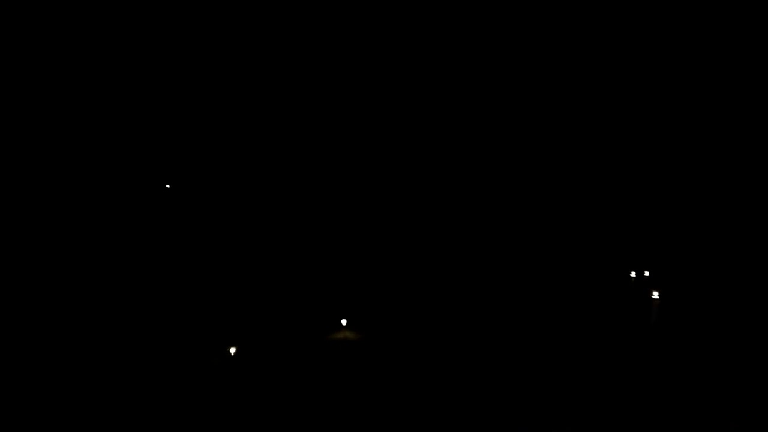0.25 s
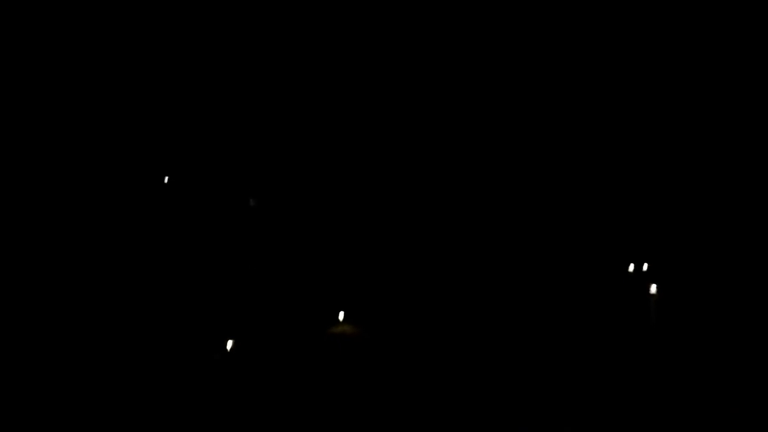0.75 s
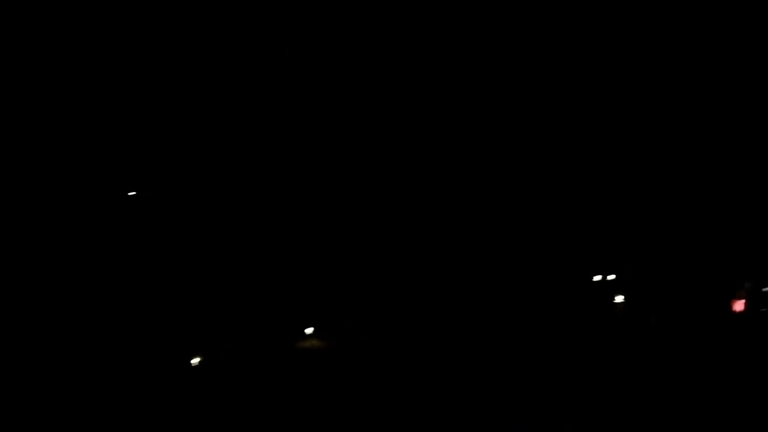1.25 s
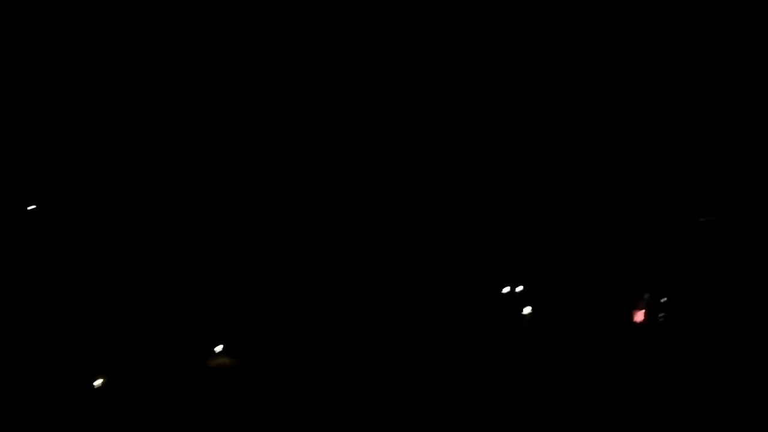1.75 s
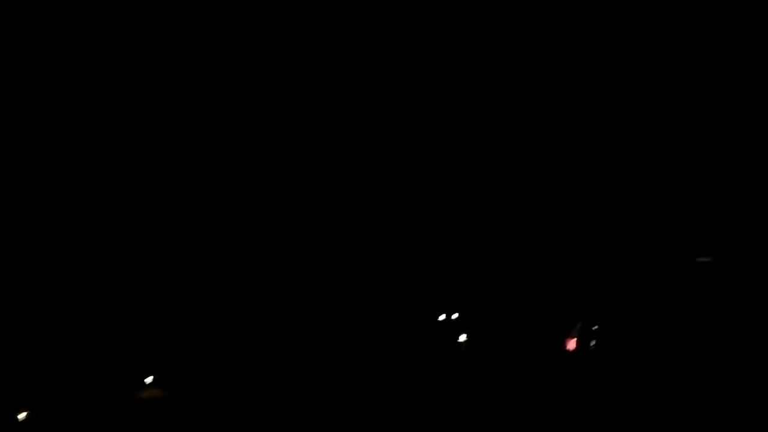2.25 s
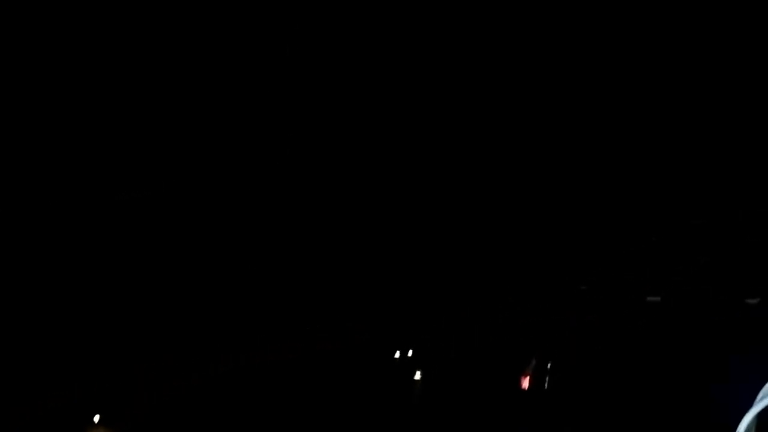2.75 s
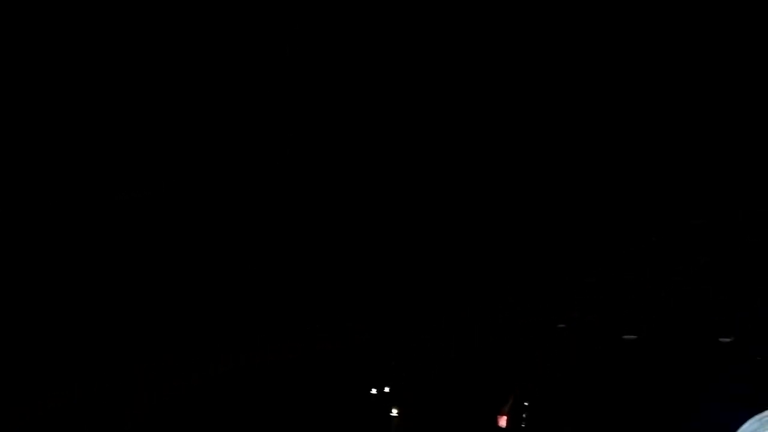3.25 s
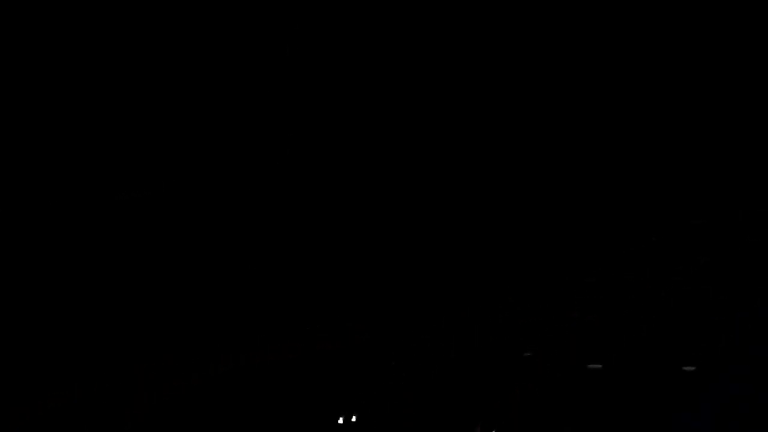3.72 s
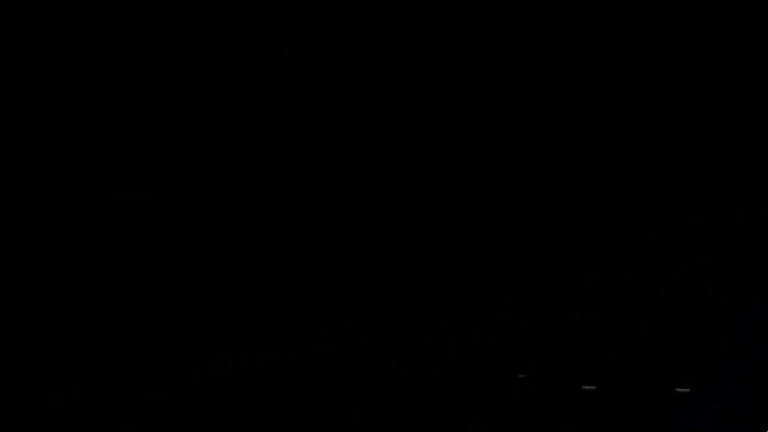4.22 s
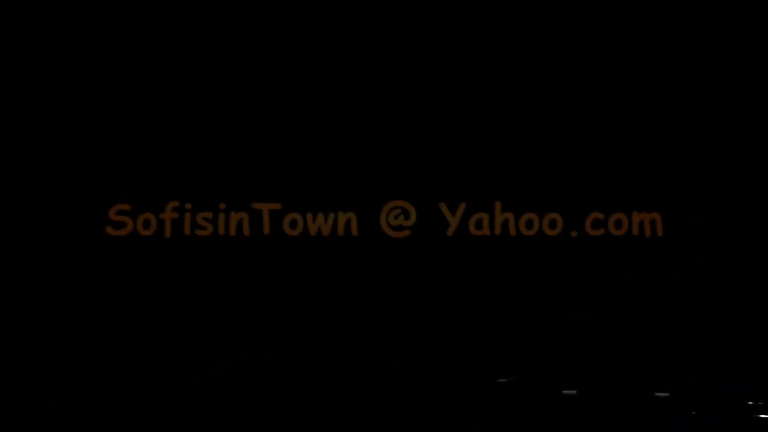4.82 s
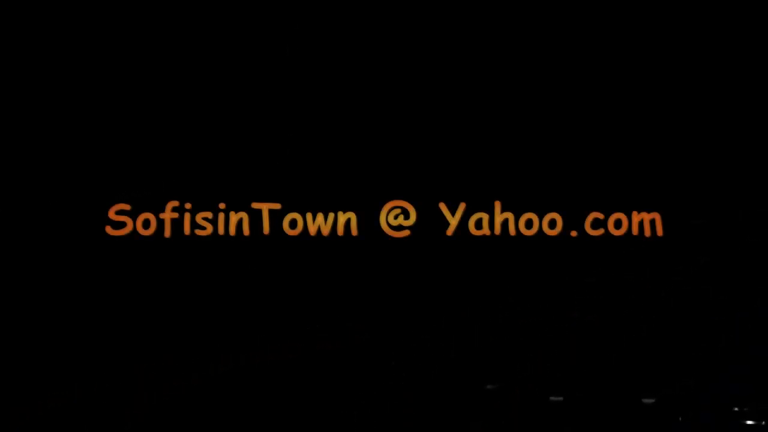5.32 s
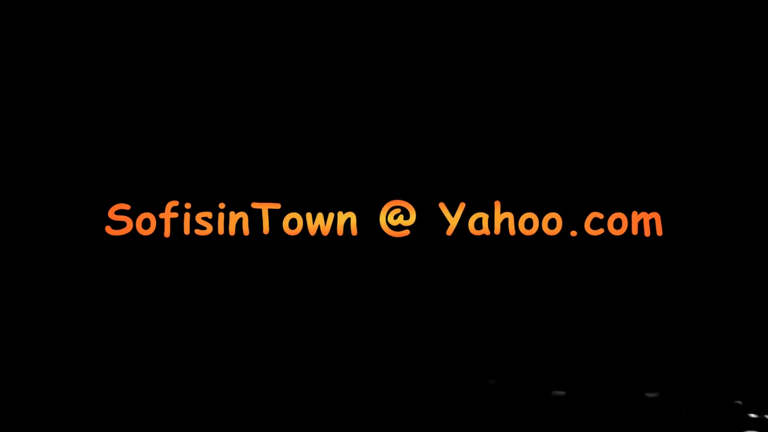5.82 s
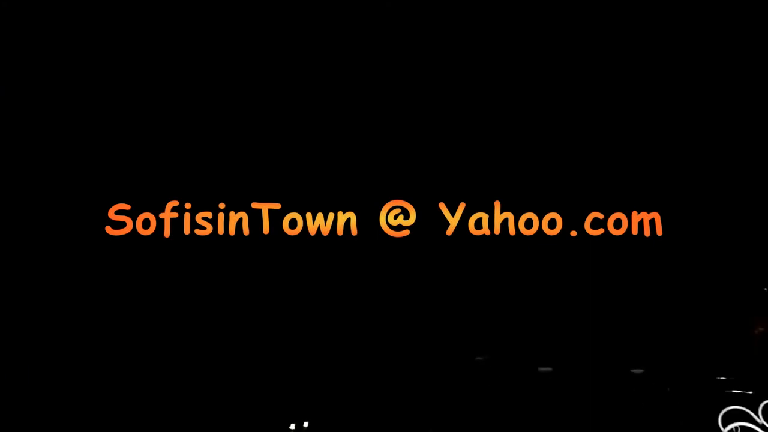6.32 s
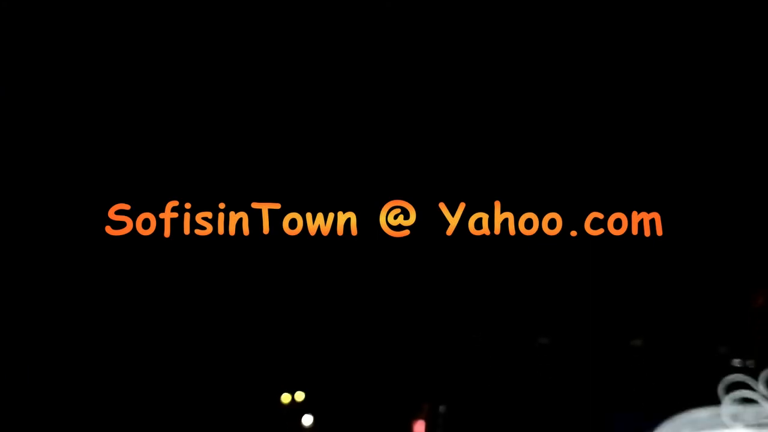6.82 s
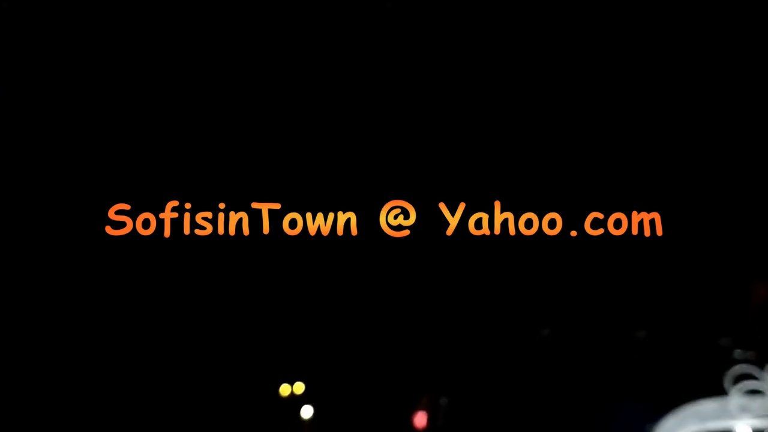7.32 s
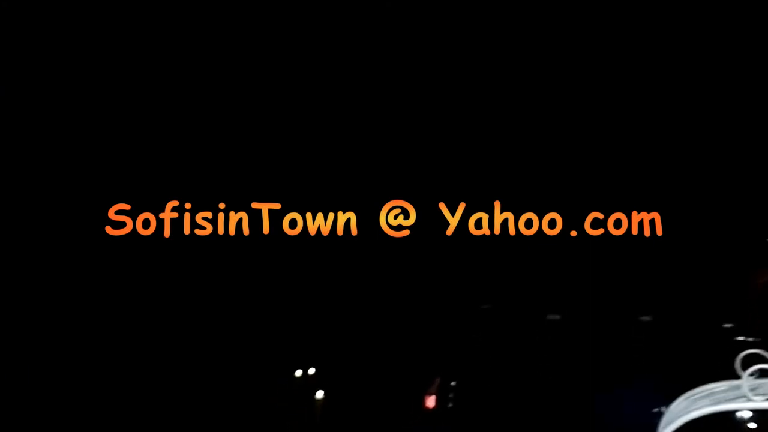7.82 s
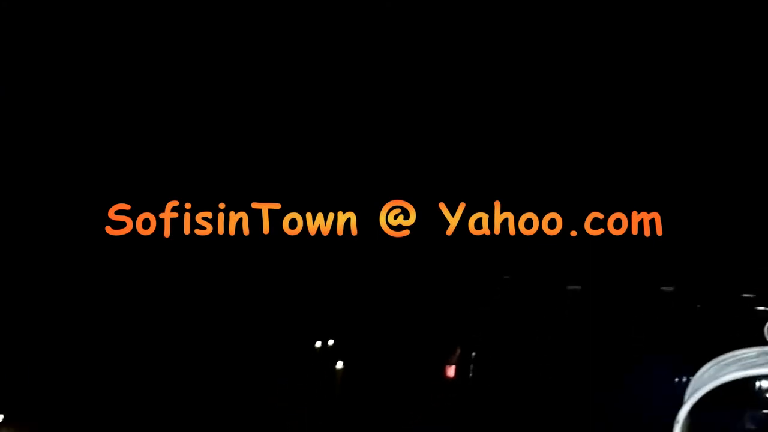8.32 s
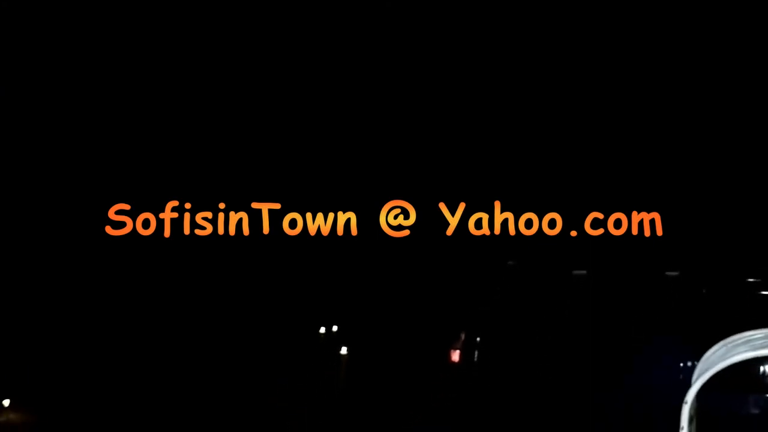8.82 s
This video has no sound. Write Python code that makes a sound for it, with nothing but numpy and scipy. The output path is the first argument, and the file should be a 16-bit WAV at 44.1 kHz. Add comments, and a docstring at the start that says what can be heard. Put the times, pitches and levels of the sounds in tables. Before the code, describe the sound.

At night beside trees, insects trill and rasp continuously while sharp, echoing firework bangs and brief crackling swarms break out at uneven intervals.

```python
"""Night beside a wood: tree crickets, katydids and a low rumble start loud and settle, under a dull far roll.
Fireworks join in: dull bangs from 0.7 s, and from 3 s swarms of crackling stars between later bangs. A last
bang near 8.5 s is followed by a few more pops. Insects are pulsed near-sines and coloured noise; bursts are
short shock waves with a slap echo off a wall and a tail scattered by the trees."""
import sys
import numpy as np
from scipy import signal
from scipy.fft import rfft, irfft, next_fast_len
from scipy.io import wavfile
from scipy.ndimage import uniform_filter1d

SR = 44100
rng = np.random.default_rng(int(sys.argv[2]) if len(sys.argv) > 2 else 0)


def dump_mix(stems):
    """Bounce the given channels to the path in sys.argv[1] as a 16-bit WAV at rate SR."""
    frames = np.atleast_2d(stems).T  # one column per channel
    limited = np.clip(frames, -1, 1)  # hard clip at full scale
    pcm = np.round(limited * 32767).astype(np.int16)
    wavfile.write(sys.argv[1], SR, pcm)


N = 399546


def from_db(db):
    """Decibels to gain."""
    return 10 ** (np.asarray(db) / 20)


def rms_one(x):
    """Scale to rms 1."""
    return x / np.sqrt(np.mean(x ** 2) + 1e-20)


def in_time(rows):
    """Table columns as curves over all samples; the first column is time."""
    s, *columns = np.transpose(rows)
    return [np.interp(np.arange(N) / SR, s, c) for c in columns]


def at_hz(points, hz):
    """Read a spectrum on a log-frequency axis."""
    return np.interp(np.log(hz + 1), np.log(np.array(points)[:, 0]), np.array(points)[:, 1])


def drift(rate_hz):
    """Slow random curve of spread 1: noise through a double pole at rate_hz, worked out every 40 samples."""
    r = np.exp(-2 * np.pi * rate_hz * 40 / SR)
    raw = rng.standard_normal(N // 40 + 2002)
    slow = signal.lfilter([1], [1, -2 * r, r * r], raw)[2000:]     # skip the filter's start-up
    return np.interp(np.arange(N) / 40, np.arange(len(slow)), rms_one(slow))


def spread(two, spectrum=None):
    """Two unrelated signals become left and right, alike in the bass, take on a colour and get rms 1."""
    # how alike left and right are: [pitch_hz, likeness 0-1]
    likeness = [(30, 0.97), (125, 0.95), (300, 0.83), (600, 0.46), (1100, 0.031), (2000, 0.028)]
    size = two.shape[1]
    hz = np.fft.rfftfreq(size, 1 / SR)
    alike = np.clip(at_hz(likeness, hz), 0, 1)
    mid, side = rfft(two)
    pair = np.sqrt(1 + alike) * mid + np.sqrt(1 - alike) * side * [[1], [-1]]
    if spectrum is not None:
        in_band = (hz > .8 * spectrum[0][0]) * (hz < 1.2 * spectrum[-1][0])
        pair = pair * from_db(at_hz(spectrum, hz)) * in_band
    return rms_one(irfft(pair, size))


def noise(spectrum):
    """Stereo noise of a given colour, rms 1."""
    return spread(rng.standard_normal((2, next_fast_len(N))), spectrum)[:, :N]


def tree_crickets(opening_db, count=24):
    """Each singer is a wavering near-sine pulsed by its wing strokes; singers alternate left and right."""
    singers, t = np.zeros((2, N)), np.arange(N) / SR
    for k, (pitch, stroke, phase) in enumerate(rng.standard_normal((count, 3))):
        pitch_hz = 3010 - 130 * abs(pitch) + 45 * drift(30)
        stroke_hz = 52 + 7 * stroke
        strokes = np.maximum(np.sin(2 * np.pi * stroke_hz * t + 9 * phase) + 1.2, 0)
        tone = np.sin(2 * np.pi * np.cumsum(pitch_hz) / SR)
        singers[k % 2] += from_db(2.4 * drift(4.7)) * strokes * tone
    return from_db(-50.5 + opening_db + 0.71 * drift(0.64)) * rms_one(singers)


def trill(opening_db, swell_db):
    """Many singers blur into a band of noise near 2-3 kHz that swells with the katydid chorus."""
    # colour of the blurred trill: [pitch_hz, relative_db per Hz]
    trill_colour = [(530, -51), (900, -21), (1340, -17.5), (1920, 0.5), (2430, -4), (2890, 0), (3190, -7.5),
                    (3600, -17), (4680, -53), (7920, -120)]
    level_db = -50.5 + 1.23 * opening_db + 0.9 * swell_db + 1.53 * drift(22)
    return from_db(level_db) * noise(trill_colour)


def throb():
    """Katydids rasp in step: evenly within a bout, each rasp a rounded swell around the mean level, in dB."""
    # bouts of rasping: [first_rasp_s, last_rasp_s, swell_db before the moving mean is taken off]
    bouts = [(0.15, 1.305, 2.6), (1.455, 1.797, 2), (2.507, 3.206, 2), (3.441, 3.786, 2),
             (4.004, 4.575, 2.8), (4.81, 5.724, 2.5), (5.95, 6.162, 1.6), (6.479, 7.063, 3.6),
             (7.388, 7.99, 2.5), (8.77, 8.9, 1)]
    rasp_s = .1165     # about the time from one rasp to the next; also the length of a swell
    peaks = np.zeros(N)
    for first_s, last_s, swell_db in bouts:
        count = round((last_s - first_s) / rasp_s) + 1
        rasps_s = np.linspace(first_s, last_s, count)
        peaks[(rasps_s * SR).astype(int)] = swell_db
    swells = signal.fftconvolve(peaks, np.hanning(round(rasp_s * SR)), "same")
    return swells - uniform_filter1d(swells, size=SR // 4)


def katydids(opening_db, chorus_db, throb_db):
    """The katydid chorus is a broad band of noise, swelling slowly and throbbing with the rasps."""
    # colour of the rasping: [pitch_hz, relative_db per Hz]
    katydid_colour = [(1880, -40), (3200, -13), (3350, -11), (3600, -11), (4090, -4), (5180, -6.5),
                      (6170, -19), (7500, -30.5), (9750, -39), (16500, -120)]
    return from_db(chorus_db + opening_db + throb_db + 0.84 * drift(42)) * noise(katydid_colour)


def insect_treble(opening_db, swell_db, throb_db):
    """Hissing treble noise that follows the chorus's swells and throbs; the right side is louder."""
    # colour of the hiss: [pitch_hz, relative_db per Hz]
    treble_colour = [(4120, -7), (7000, -9), (8020, -17), (9500, -7.5), (11200, -7.5), (12300, -7.5),
                     (15200, -6)]
    level_db = -61 + opening_db + 1.23 * swell_db + 0.61 * throb_db + 0.47 * drift(20)
    left_right_db = np.array([[-2.0], [1.8]])
    return from_db(level_db + left_right_db) * noise(treble_colour)


def rumble(opening_db):
    """Low noise, mostly below 300 Hz, that wavers slowly."""
    # colour of the rumble: [pitch_hz, relative_db per Hz]
    rumble_colour = [(12, -44), (20, -8), (37, -25), (65, -5), (124, -4.5), (140, -13), (178, -5),
                     (300, -10.5), (390, -19), (660, -120)]
    return from_db(-57.5 + opening_db + 0.81 * drift(2.4)) * noise(rumble_colour)


def far_roll():
    """Far echoes run together into a dull roll: low-mid noise riding a drawn level curve."""
    # level of the roll, before its waver: [time_s, level_db]
    roll_curve = [(0, -44), (.25, -56), (.8, -59), (1.5, -69), (2.0, -45), (2.35, -49.5), (2.95, -46.5),
                  (3.45, -39), (4.0, -50), (4.6, -54), (6.2, -57), (7.1, -56), (7.85, -57.5), (8.2, -44),
                  (8.5, -59), (9.06, -48)]
    # colour of the far echoes: [pitch_hz, relative_db per Hz]
    roll_colour = [(88, -46), (150, -26), (344, 2.5), (377, -3), (405, 2), (684, 4), (1300, -21),
                   (1690, -46), (2860, -120)]
    (roll_db,) = in_time(roll_curve)
    return from_db(roll_db + 2.0 * drift(7.1)) * noise(roll_colour)


def shock(length_ms, edge_hz, treble_db, treble_hz, thump_db):
    """N-shaped wave; ground and foliage cut it steeply above an edge and let a little treble through; peak 1."""
    t = np.arange(2048) / SR * 1000 / length_ms     # in wave lengths
    wave = (1 - 2 * t) * (t < 1) * np.exp(-.6 * t)     # the suction phase is the weaker
    body = signal.sosfilt(signal.cheby1(6, 1.5, edge_hz, fs=SR, output="sos"), wave)
    front = (t > .6) * np.exp(-t * 3.8)     # the treble comes from this steep front alone
    treble = signal.sosfilt(signal.butter(2, [edge_hz, treble_hz], "band", fs=SR, output="sos"), front)
    both = body + from_db(treble_db) * treble / np.abs(treble).max()
    # the ground shakes
    thump = signal.sosfilt(signal.butter(1, [55, 130], "band", fs=SR, output="sos"), body)
    both = signal.sosfilt(signal.butter(1, 260, "high", fs=SR, output="sos"), both)
    both = both + from_db(thump_db) * thump
    return both / np.abs(both).max()


def paths(slap_db, scatter_db, t60, depth_s, late_db, bass_db, lift_db, echo_db=0):
    """Direct path, wall echo, reflections close by after each, trunks as deep as the wood goes, far hills."""
    # sound returned by trunks and posts, before bass and lift: [pitch_hz, relative_db]
    scatter_colour = [(40, -19), (120, -1.5), (250, -2.5), (450, -3), (750, 5.5), (1200, 4.5), (2000, 3),
                      (4000, -1.5)]
    # single echoes off the ground and nearby houses: [delay_s, level_db before echo_db]
    echoes = [(0.00192, -12.5), (.0455, -14.5), (0.079, -17), (.127, -18.5), (.0336, -17), (0.00758, -15.5)]
    slap_s = .0316     # the wall echo comes this much later
    slap_at = round(slap_s * SR)
    size = 2 * SR
    t = np.arange(size) / SR
    # about 6000 random reflections a second
    hits = rng.standard_normal((2, size)) * (rng.random((2, size)) < 6000 / SR)
    lumps = from_db(1.6 * drift(22)[:size])     # clumps of trees answer together
    trunks = from_db(-60 * t / t60) / (1 + (t / depth_s) ** 4)
    trunks = trunks * np.clip((t - slap_s) / 0.021, .25, 1)
    hills = from_db(late_db - 60 * t / 3.05) * np.clip(t / 0.011, 0, 1)
    near = from_db(10 - 60 * t / .055) * np.clip((t - .002) / .003, 0, 1)
    near = near + from_db(slap_db + 1.0) * np.roll(near, slap_at) * (t > slap_s)
    colour = [(hz, db + bass_db * (hz < 400) + lift_db * (hz > 1000)) for hz, db in scatter_colour]
    out = from_db(scatter_db) * spread(hits, colour) * lumps * (trunks + hills + near)
    out[:, 0] += 1     # direct path
    out[:, slap_at] += from_db(slap_db)
    for delay_s, db in echoes:
        out[:, round(delay_s * SR)] += from_db(db + echo_db)
    return out


def shells():
    """Each burst is a shock wave heard over its own set of paths, with a wash of treble off the leaves."""
    # bursts: [trough_s, level_db of the direct wave's peak, length_ms of the shock, slap_db of the wall echo,
    # scatter_db, depth_s of the wood that answers, bass_db of the tail, treble_db of the shock]
    shell_list = [(0.706, -27.5, 2.03, -1.5, -31.5, 0.11, 3.5, -26),
                  (1.5959, -8, 1.93, -2, -31.5, 0.22, 4, -25),
                  (2.3991, -1.5, 1.57, -1.2, -33, 0.72, 2, -27.5),
                  (4.173, -6.5, 1.53, -3.5, -34.5, 0.22, 1.5, -26),
                  (5.1465, -27.5, 2, -9, -34.5, 0.12, 5, -18.5),
                  (6.5716, -7, 1.57, -4, -35.5, 0.13, 3.5, -22.5),
                  (6.899, -29, 1.5, -5, -34, 0.084, 4, -17), (8.4599, -2.5, 1.9, -4, -34.5, .83, 0.2, -27)]
    # leaves scatter the treble into a smooth wash: [pitch_hz, relative_db per Hz]
    leaf_colour = [(800, -36), (1000, 6.5), (1500, -12.5), (2200, -2), (3000, 4.5), (3500, -22),
                   (4500, -25)]
    wash_db, wash_t60_s, wash_rise_s = -36.5, 2.17, .035     # wash_db is relative to the burst's level
    out, wash = np.zeros((2, N + 3 * SR)), np.zeros(N + SR)
    t = np.arange(SR) / SR
    for trough_s, db, length_ms, slap_db, scatter_db, depth_s, bass_db, treble_db in shell_list:
        wave = shock(length_ms, 801, treble_db, 1920, thump_db=-6.0)
        way = paths(slap_db, scatter_db, 0.91, depth_s, -14.5, bass_db, lift_db=7)
        bang = signal.fftconvolve(way, wave[None], axes=1)
        at = round(trough_s * SR) - wave.argmin()
        out[:, at:at + bang.shape[1]] += from_db(db) * bang
        fade = from_db(db + wash_db - 60 * t / wash_t60_s) / (1 + (t / (1.6 * depth_s)) ** 4)
        wash[at:at + SR] += fade * np.clip(t / wash_rise_s, 0, 1)
    return out[:, :N] + wash[:N] * noise(leaf_colour)


def crackle():
    """Stars pop as short shocks: some placed singly, the swarms at random; all share one set of paths."""
    # single pops, some of them echoes of an earlier pop:
    # [peak_s, level_db of the direct wave's peak, length_ms of the shock]
    single_pops = [(3.057, -30, 1.3), (3.162, -24.5, 1.24), (3.238, -29, 1.24), (3.2675, -26, 1.3),
                   (3.4186, -27, 1.2), (3.4346, -27.5, 0.94), (3.444, -28, 1), (3.484, -25.5, 1.5),
                   (3.5563, -27, 1), (3.6514, -27, 1.3), (3.7053, -34, 0.85), (5.322, -38, 0.89),
                   (5.3624, -31.5, 1.2), (5.4122, -37.5, 0.73), (5.4676, -34, 1.65), (5.541, -28, 0.86),
                   (5.5666, -29, 0.78), (5.5755, -27, 0.79), (5.6075, -29.5, 1.2), (5.6181, -26.5, 1.07),
                   (5.6524, -25.5, 1.21), (5.6661, -24.5, 0.79), (5.685, -25.5, 1.1), (5.7176, -27, 0.9),
                   (5.74, -29, 1.2), (5.748, -24.5, 0.86), (5.7552, -26, 0.74), (5.7916, -37, 0.85),
                   (5.8218, -28, 0.77), (5.8453, -27.5, 1.26), (5.931, -44, 0.71), (5.948, -33, 0.96),
                   (5.98, -40, 1.3), (8.047, -29.5, 1.13), (8.0772, -30, 0.76), (8.1056, -32.5, 2.3),
                   (8.2843, -30, 0.83), (8.331, -32, 0.94), (8.376, -32.5, 0.85), (8.6557, -19, 1.34),
                   (8.681, -22, 1.5), (8.737, -21, 1.46), (8.7574, -20.5, 1.53)]
    # swarms of small stars: [start_s, peak_s, end_s, level_db at the peak before sizes and shock gains,
    # edge_db at start and end relative to that, bright 0-1: sharp share of each pop before the gains];
    # the last row ends before its peak, so it lasts only 3 ms
    swarms = [(2.982, 3.454, 3.8, -42.5, -6.5, 0.36), (5.446, 5.68, 5.96, -42.5, -14, 0.59),
              (7.84, 8.146, 8.45, -46.5, -11.5, 0.52), (8.547, 8.7, 8.55, -42.5, -8, 0.47)]
    pops = np.zeros(N + SR)
    for peak_s, db, length_ms in single_pops:
        wave = shock(length_ms, 1350 / length_ms, -20, 1950, thump_db=-10.5)
        at = round(peak_s * SR) - np.abs(wave).argmax()
        pops[at:at + len(wave)] += from_db(db) * wave
    sharp_shock = from_db(12.0) * shock(0.76, 1460, -15, 2440, thump_db=-24)
    dull_shock = from_db(-10.0) * shock(1.8, 860, -17, 2000, thump_db=-17)
    for start_s, peak_s, end_s, peak_db, edge_db, bright in swarms:
        shape_db = np.interp(np.arange(N) / SR, [start_s, peak_s, end_s], [edge_db, 0, edge_db], -120, -120)
        sizes_db = 4 * np.minimum(rng.exponential(1, N), 2.5)
        # about 220 pops a second
        born = (rng.random(N) < 220 / SR) * from_db(peak_db + shape_db + sizes_db)
        sharp = signal.fftconvolve(born * bright, sharp_shock)
        dull = signal.fftconvolve(born * (1 - bright), dull_shock)
        pops[:N] += (sharp + dull)[:N]
    way = paths(slap_db=-8, scatter_db=-44.0, t60=0.54, depth_s=0.42, late_db=-13,
                bass_db=10.0, lift_db=8.5, echo_db=-7.5)
    return signal.fftconvolve(way, pops[None], axes=1)[:, :N]


def scene():
    """Fireworks over the night chorus, whose layers share an opening, a slow swell and a throb."""
    # the background starts louder and settles, in dB above the later level:
    # [time_s, opening_db of crickets and rumble, katydid_opening_db]
    opening = [(0, 12.1, 12.2), (.15, 12, 9.1), (.27, 6.8, 8.1), (.43, 8.2, 8.5), (.58, 10.3, 8.1),
               (.73, 5.3, 4.8), (.85, 4.6, 4.9), (1.1, 0.62, 1.3), (1.5, 0.033, 0.13)]
    # the katydid chorus swells and sinks: [time_s, level_db before opening and throb]
    chorus = [(0, -50.5), (1.11, -48.5), (1.51, -48), (1.99, -50.5), (2.55, -48.5), (3.25, -50),
              (3.56, -49.5), (3.96, -47), (4.64, -51.5), (5.07, -48), (5.4, -47.5), (6.03, -52),
              (6.55, -47), (7.06, -50.5), (7.95, -47.5), (8.7, -52), (9.06, -50)]
    opening_db, katydid_opening_db = in_time(opening)
    (chorus_db,) = in_time(chorus)
    swell_db = chorus_db + 50.5     # relative to a middling chorus of -50.5 dB
    throb_db = throb()
    insects = tree_crickets(opening_db) + trill(opening_db, swell_db)
    insects += katydids(katydid_opening_db, chorus_db, throb_db)
    insects += insect_treble(katydid_opening_db, swell_db, throb_db)
    return insects + rumble(opening_db) + far_roll() + shells() + crackle()


def record(dry):
    """The loudest peaks are flattened, the positive side sooner; the top is cut above 15.8 kHz."""
    # small microphones lose the deepest bass
    dry = signal.sosfilt(signal.butter(1, 40, "high", fs=SR, output="sos"), dry)
    ceiling = np.where(dry > 0, .6, .67)
    held = dry / (1 + (dry / ceiling) ** 6) ** (1 / 6)
    return signal.sosfilt(signal.ellip(10, .5, 70, 15780, fs=SR, output="sos"), held)


dry = scene()
out = record(dry)
dump_mix(out)
```